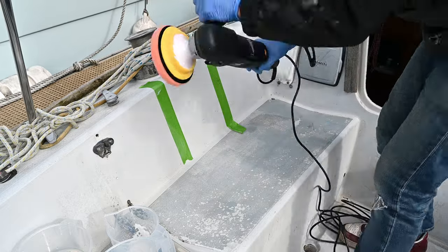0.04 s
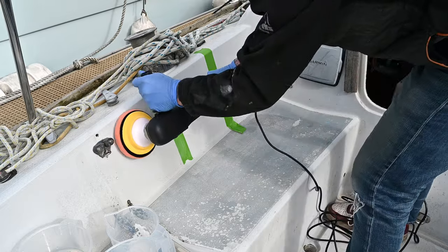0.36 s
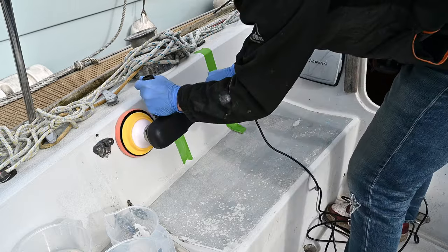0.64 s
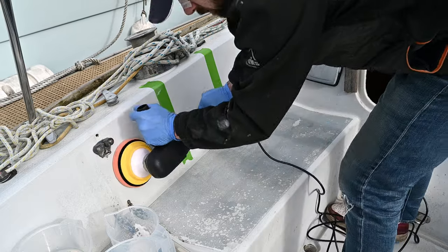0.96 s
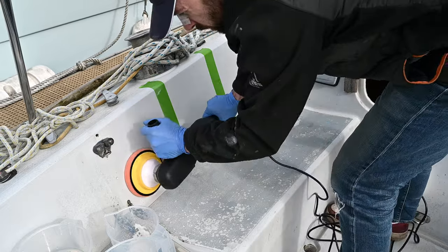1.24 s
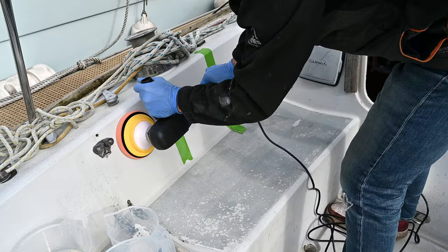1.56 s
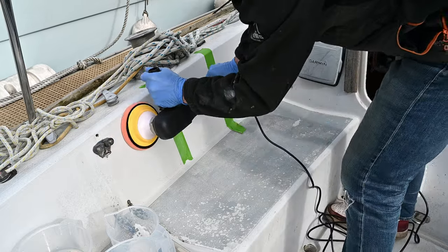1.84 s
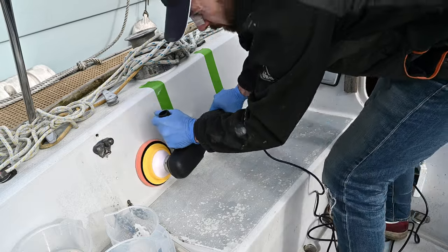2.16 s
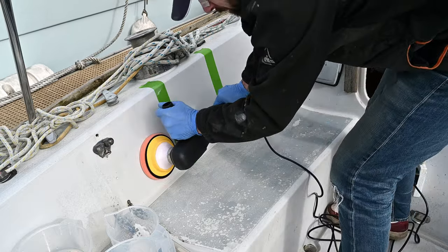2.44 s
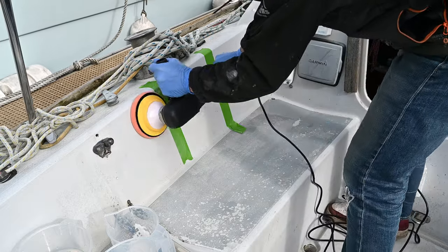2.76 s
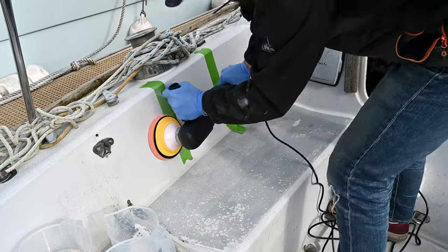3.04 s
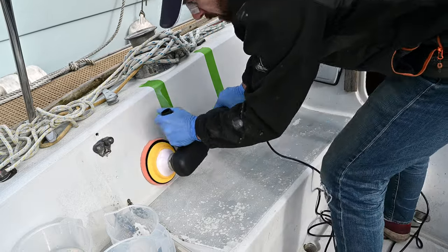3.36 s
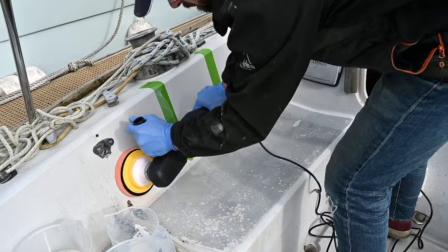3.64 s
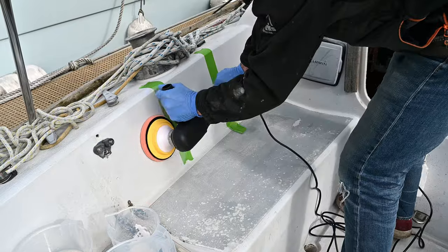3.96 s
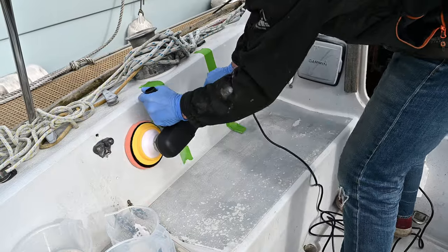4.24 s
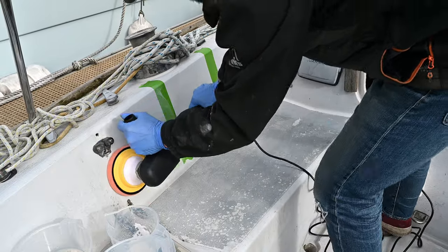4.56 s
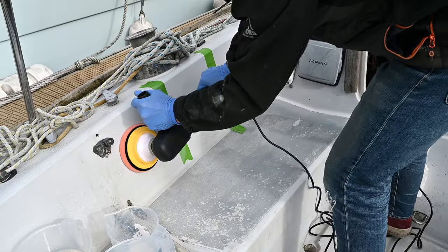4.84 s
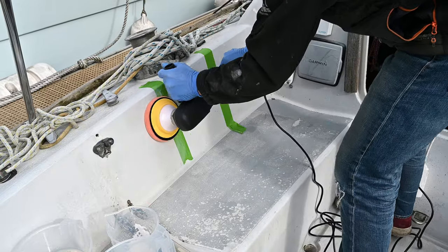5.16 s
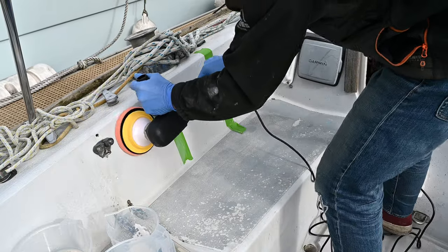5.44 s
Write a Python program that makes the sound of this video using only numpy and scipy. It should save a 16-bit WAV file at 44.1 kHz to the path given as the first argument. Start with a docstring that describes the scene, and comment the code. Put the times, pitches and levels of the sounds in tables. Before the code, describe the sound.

After a few soft bumps and a trigger snap, a power polisher buffs fibreglass with a raspy, high whine and short squeals.

```python
"""An electric polisher buffs the fibreglass cockpit of a boat, heard from close by.
Its foam pad is set against the wall, the trigger snaps, and the motor eases up to a held speed.
Gear teeth whine, the motor's brushes hiss, and cooling air rasps through the housing.
The pad rubs, groans and squeals on the panel, slowing the motor a little each time it grabs.
Behind it is quiet open air, and a faint haze of high treble widens the sound to left and right."""
import sys
import numpy as np
from scipy import signal
from scipy.fft import rfft, irfft, next_fast_len
from scipy.io import wavfile
from scipy.ndimage import uniform_filter1d

SR = 44100
rng = np.random.default_rng(int(sys.argv[2]) if len(sys.argv) > 2 else 0)


def wav_record(signal):
    """Record a signal, one row per channel, as 16-bit PCM in the file named by sys.argv[1]."""
    frames = np.transpose(np.atleast_2d(signal))
    bounded = np.clip(frames, -1, 1)
    # unit amplitude maps onto the largest positive 16-bit level
    quanta = np.round(bounded * 32767).astype(np.int16)
    wavfile.write(sys.argv[1], SR, quanta)


N = 246959
TIME = np.arange(N) / SR


def amp(db):
    """Turn decibels into a gain."""
    return 10 ** (np.asarray(db) / 20)


def unit(x):
    """Scale x to an average (rms) level of 1."""
    return x / np.sqrt(np.mean(x ** 2) + 1e-20)


def noise():
    """Fresh white noise."""
    return rng.standard_normal(N)


def curves(rows):
    """Join timed rows with straight lines: one curve for each column after the time."""
    times, *columns = np.transpose(rows)
    return [np.interp(TIME, times, column) for column in columns]


def wobble(rate):
    """A smooth random curve of level 1 that passes through about `rate` new values a second."""
    values = rng.standard_normal(int(N * rate / SR) + 4)
    return unit(signal.resample(values, next_fast_len(N))[:N])


def swell(middle, length):
    """A smooth bump in time, `length` seconds wide at half height."""
    offset = np.linspace(-1, 1, 41)
    return np.interp(TIME, middle + length * offset, np.cos(np.pi * offset / 2) ** 2)


def burst(start, rise, fade):
    """The outline of a tap: it rises quickly, then falls 60 dB in `fade` seconds."""
    age = np.maximum(TIME - start, 0)
    return (1 - np.exp(-age / rise)) * amp(-60 * age / fade)


def filtered(x, response):
    """Turn each frequency of x up or down by the gain that `response` gives it."""
    size = next_fast_len(N + SR // 4)
    return irfft(rfft(x, size) * response(np.fft.rfftfreq(size, 1 / SR)), size)[..., :N]


def shaped(x, points):
    """Filter x along a curve of (Hz, dB) points."""
    hz, db = np.transpose(points)
    return filtered(x, lambda f: amp(np.interp(np.log(f + 1), np.log(hz), db)))


def coloured(x, points):
    """Give x a tone colour and bring it to level 1."""
    return unit(shaped(x, points))


def resonant(x, modes, surge_db):
    """Let x ring at (Hz, width in Hz, dB) resonances that each swell and fade, at level 1."""
    total = 0
    for k, (hz, width, db) in enumerate(modes):
        ring = filtered(x, lambda f: 1j * f * width / (hz * hz - f * f + 1j * f * width))
        total += (-1) ** k * amp(db + surge_db * wobble(20)) * ring
    return unit(total)


# The tone colour of the open air. Each row: frequency in Hz, level in dB.
OPEN_AIR_COLOUR = [(15, -37), (25, -41), (125, -12.5), (278, 1.5), (2500, -16.5), (2780, -33), (15000, -72)]
# The low rumble. Each row: time in seconds, level in dB.
RUMBLE_LEVELS = [(0, -53.5), (.75, -59), (1, -78), (3.55, -65), (3.66, -54.5), (3.95, -55), (4.3, -72),
                 (4.7, -61), (5.2, -62), (5.6, -78)]

def outdoors():
    """Quiet open air with a low rumble that comes and goes."""
    rumble = coloured(noise(), [(15, -11), (45, -6), (90, 0.5), (250, -13), (2000, -80)])
    return amp(curves(RUMBLE_LEVELS)[0]) * rumble + amp(-51.5) * coloured(noise(), OPEN_AIR_COLOUR)


# The tone colour of the treble haze. Each row: frequency in Hz, level in dB next to the main sound.
SPREAD_COLOUR = [(1500, -91), (2900, -46), (5000, -41), (7000, -24.5), (10000, -14), (12000, -13.5),
                 (15000, -10)]

def treble_spread(x, fade_s):
    """A faint, short haze of high treble that widens the sound to left and right."""
    age = np.arange(SR // 10) / SR
    tail = rng.standard_normal(len(age)) * amp(-60 * age / fade_s)
    haze = signal.fftconvolve(x, tail / np.linalg.norm(tail))[:N]
    return shaped(haze, SPREAD_COLOUR)


# Soft bumps. Each row: start in seconds, level in dB, strongest frequency in Hz, fade in seconds.
WALL_TOUCHES = [(.123, -40.5, 2520, 0.091), (0.1837, -27.5, 6000, 0.012), (0.2005, -26, 1940, 0.019),
                (0.216, -24.5, 1950, 0.034), (0.212, -32.5, 342, 0.1), (.313, -39, 3950, 0.046),
                (0.381, -41, 4300, 0.021), (0.4, -36.5, 2800, 0.047), (0.469, -38.5, 4300, 0.026)]
# The foam brushing the wall. Each row: time in seconds, level in dB.
FOAM_LEVELS = [(0, -49.5), (.11, -47.5), (.14, -42.5), (.22, -42.5), (.25, -50), (.6, -50)]

def setting_down():
    """Pad and hands bump the wall, and the foam brushes against it."""
    bumps = 0
    for start, db, hz, fade in WALL_TOUCHES:
        colour = [(hz / 2, -8), (hz, 0), (hz * 1.48, -12), (hz * 2, -24), (hz * 10, -58)]
        bumps += amp(db) * burst(start, 0.0011, fade) * coloured(noise(), colour)
    foam = coloured(noise(), [(100, 3.5), (1000, 14.5), (3500, 4.5), (6000, -9), (15000, -22.5)])
    return bumps + amp(curves(FOAM_LEVELS)[0]) * foam


# The trigger's snap and its rebound. Each row: start in seconds, level in dB.
TRIGGER_SNAPS = [(0.555, -14.5), (0.561, -31)]
# The tone colour of a snap. Each row: frequency in Hz, level in dB.
SNAP_COLOUR = [(120, -44), (200, -15), (677, -20), (992, -14), (1590, -4), (2380, -9), (2800, 1),
               (3480, -17), (6130, -13), (6830, -20), (12000, -36), (15500, -41)]

def trigger():
    """The hard plastic trigger snaps, leaving a faint, longer ring in the casing."""
    snaps = sum(amp(db) * (burst(start, 0.0013, 0.016) + amp(-20) * burst(start, 0.0022, 0.16))
                for start, db in TRIGGER_SNAPS)
    return snaps * coloured(noise(), SNAP_COLOUR)


# Moments when the pad grabs the panel's glossy coat.
# Each row: middle in seconds, length in seconds, squeal level in dB, drop in tooth rate in Hz.
PAD_GRABS = [(1.076, 0.059, -29, 14.3), (1.192, 0.093, -35, 21.6), (1.319, 0.049, -35, 16.2),
             (1.444, .09, -27, 22.8), (1.751, 0.059, -32, 13.6), (1.882, .08, -27, 24.3),
             (1.99, 0.061, -27.5, 28), (2.186, .1, -37, 19), (2.37, .14, -44, 19.7),
             (2.63, 0.11, -31, 25.6), (2.858, 0.078, -28, 25), (2.969, 0.054, -25, 25),
             (3.093, .11, -25.5, 26), (3.259, 0.095, -30, 18.2), (3.498, 0.047, -42, 17),
             (3.632, .11, -31.5, 19), (3.82, 0.16, -26.5, 26), (4.002, .07, -29.5, 14.4),
             (4.17, 0.059, -28.5, 24.3), (4.389, .11, -29.5, 20.8), (4.69, 0.065, -26.5, 20.5),
             (4.831, .1, -28, 18), (4.982, .15, -40, 13.2)]

def grabs():
    """Each grab squeals and drags the motor down: gives the squeal's gain and the drop in Hz."""
    squeal_gain = sum(amp(db) * swell(middle, length) for middle, length, db, _ in PAD_GRABS)
    sag_hz = sum(hz * swell(middle, length) for middle, length, _, hz in PAD_GRABS)
    return squeal_gain, sag_hz


# "Speed" is the tooth rate: how many gear teeth meet each second.
SWITCH_ON_S, SPIN_UP_S, FULL_SPEED_HZ = TRIGGER_SNAPS[0][0], 0.29, 1019
TEETH_PER_PAD_TURN = 87

def shaft(sag_hz):
    """One shaft drives the gears and the slow, off-centre pad; it starts softly, then holds its speed."""
    ramp = np.clip((TIME - SWITCH_ON_S) / SPIN_UP_S, 0, 1) ** 2
    speed = ramp * (FULL_SPEED_HZ - sag_hz)
    pad_turn = np.sin(2 * np.pi * np.cumsum(speed) / SR / TEETH_PER_PAD_TURN + .5 * wobble(4))
    hunting = .003 * wobble(14)  # the speed control drifts around its target
    pad_drag = .003 * pad_turn  # the pad slows the shaft slightly once a turn
    uneven_speed = speed * (1 + hunting + pad_drag + .002 * wobble(45))
    tooth_phase = 2 * np.pi * np.cumsum(uneven_speed) / SR
    return speed, tooth_phase, pad_turn


def drive(speed, full_hz=590):
    """Rasping and rubbing grow with speed, from a gain of -20 dB up to 0 dB."""
    return np.maximum(np.minimum(speed / full_hz, 1) ** 1.6, amp(-20))


# How hard the pad leans on the panel. Each row: time in seconds, pressure in dB.
PAD_PRESSURE = [(0.85, -42.5), (1.3, -36), (1.54, -45), (2.04, -38.5), (2.24, -36), (2.25, -42.5),
                (2.34, -33), (2.79, -40.5), (3.28, -32.5), (3.52, -39), (4.18, -35), (4.22, -43),
                (4.37, -36.5), (4.49, -39.5), (5.28, -42), (5.6, -48)]
# The tone colour of the rubbing. Each row: frequency in Hz, level in dB.
RUB_COLOUR = [(25, -37), (100, -39), (210, -8), (480, 0), (620, 1), (820, 1), (1000, -11), (1800, 1.5),
              (5000, -19.5)]
# Where the panel groans and the pad squeals. Each row: pitch in Hz, width in Hz, level in dB.
PANEL_RINGS = [(616.8, 69, 0), (732, 110, -2), (1560, 150, -6)]
SQUEAL_RINGS = [(1137, 140, 0.047), (1234, 89, 0.45)]

def pad(speed, pad_turn, grab_gain):
    """The foam sticks and slips; pressing harder makes the panel groan, and each grab squeals."""
    press_db = curves(PAD_PRESSURE)[0] + 38  # 0 for an ordinary stroke
    slips = amp(2.0 * wobble(190) + 0.85 * pad_turn)
    rub = amp(-38.5 + 0.5 * press_db) * coloured(noise() * slips, RUB_COLOUR)
    # the slips partly lock to the panel's lowest ring: a wandering tone and its octave
    slip_phase = 2 * np.pi * PANEL_RINGS[0][0] * TIME + 0.99 * wobble(70)
    groan = amp(-3.5) * resonant(noise() * slips, PANEL_RINGS, surge_db=2.5)
    groan += amp(-6.5) * np.sin(slip_phase)
    squeal = amp(-6.5) * resonant(noise() * slips, SQUEAL_RINGS, surge_db=1.8)
    squeal += amp(-4.5) * np.sin(2 * slip_phase)
    squeal_gain = np.hypot(amp(-36), grab_gain)  # a little squeal stays between grabs
    return drive(speed) * (rub + amp(-38.5 + 1.76 * press_db) * groan + squeal_gain * squeal)


# The tone colour of the cooling air. Each row: frequency in Hz, level in dB.
AIR_COLOUR = [(60, -28.5), (500, -15), (900, -2.5), (1400, -5.5), (1900, -4), (2130, -7), (2350, -4),
              (2800, -3), (3050, 2.5), (3380, -5), (3600, -3.5), (4100, -5.5), (4500, -10), (5100, -9),
              (6600, -16.5), (10000, -18), (10700, -25.5), (15000, -31)]
# Where the housing rings. Each row: pitch in Hz, width in Hz, level in dB.
HOUSING_RINGS = [(2756, 280, 2), (3250, 93, -1)]
# Spells of harder rattling. Each row: middle in seconds, length in seconds, rise in dB.
RATTLE_SPELLS = [(1.022, 0.058, 6), (2.08, .1, 5.5), (2.424, 0.079, 5), (2.93, .12, 4), (3.38, 0.084, 6.5),
                 (3.87, .12, 4.5), (4.549, 0.26, 3.5)]

def housing_rasp(speed, grit):
    """Cooling air rushes through the housing, which rings and now and then rattles harder."""
    air = amp(-1) * coloured(noise() * grit, AIR_COLOUR)
    shaken_db = sum(db * swell(middle, length) for middle, length, db in RATTLE_SPELLS)
    rattle = amp(-6 + shaken_db) * resonant(noise() * grit, HOUSING_RINGS, surge_db=2)
    return amp(-27.5) * drive(speed) * (air + rattle)


# How the buzz comes and goes. Each row: time in seconds, level in dB before its swings are widened.
BUZZ_LEVELS = [(0.75, -32.5), (0.78, -33), (0.91, -37.5), (1.8, -31.5), (1.92, -35.5), (3.07, -36),
               (3.11, -32), (3.6, -36), (5.23, -39.5), (5.57, -31.5), (5.6, -41)]

def body_buzz(speed, grit, pitch_hz=1607, width_hz=105):
    """A lower resonance of the tool buzzes on and off."""
    swing_db = 1.42 * (curves(BUZZ_LEVELS)[0] + 38)
    ring = resonant(noise() * grit, [(pitch_hz, width_hz, 0)], surge_db=3)
    return amp(-41 + swing_db) * drive(speed) * ring


# The tone colour of the brushes. Each row: frequency in Hz, level in dB.
BRUSH_COLOUR = [(5000, -14), (9800, -2), (10700, -6.5), (12250, 3.5), (12750, 0), (13200, 3), (13800, -5),
                (14300, -5), (17000, -18)]
# How the treble rises and falls. Each row: time in seconds, gear whistle in dB, brush hiss in dB.
TREBLE_LEVELS = [(0.85, -52, -43), (0.92, -39.5, -40.5), (1.84, -45.5, -43), (2.46, -38.5, -45),
                 (2.77, -45.5, -43), (3.15, -47, -47.5), (3.61, -40.5, -42), (3.82, -39, -42.5),
                 (4.3, -43.5, -46), (4.57, -43.5, -40.5), (4.87, -45, -44.5), (5.07, -40, -45),
                 (5.17, -39, -46), (5.23, -41.5, -40), (5.58, -49, -41), (5.6, -40, -46)]

def brush_hiss(speed, grit):
    """The brushes slide on the motor's spinning contacts and hiss louder the faster they run."""
    _, hiss_db = curves(TREBLE_LEVELS)
    speed_gain = np.maximum((speed / FULL_SPEED_HZ) ** 3, amp(-30))
    flicker_db = 2.5 * wobble(45)
    return amp(hiss_db + 1 + flicker_db) * speed_gain * coloured(noise() * grit, BRUSH_COLOUR)


# The rough tones of the motor's spinning core. Each row: multiple of the tooth rate, level in dB.
ROTOR_TONES = [(.207, -14), (2.215, -2), (2.71, 0), (3.213, 4), (4.803, 3.5), (5.222, -2.5), (6.225, -3),
               (9.6, -12)]

def rotor(speed, tooth_phase):
    """The spinning contacts and fan add unsteady tones that rise and fall with the brush hiss."""
    tones = 0
    for multiple, db in ROTOR_TONES:
        flutter_db = 3.5 * wobble(25.23)
        tones += amp(db + flutter_db) * np.sin(multiple * tooth_phase + 1.53 * wobble(70))
    _, hiss_db = curves(TREBLE_LEVELS)
    swing_db = 0.78 * (hiss_db + 43)
    return amp(-42 + swing_db) * drive(speed) * tones


def gear_knocks(speed, below_hz=780):
    """While the motor gathers speed, the gear teeth knock across the slack between them."""
    speed_gain_per_s = np.gradient(speed) * SR
    pull = np.clip(speed_gain_per_s / 4000, 0, 1) * (speed < below_hz)
    chatter = noise() * amp(2.7 * wobble(360))
    knocks = resonant(chatter, [(193, 92, -14), (1630, 110, -9), (2000, 270, -7)], surge_db=1.5)
    return amp(-31) * drive(speed) * uniform_filter1d(pull, size=2000) * knocks


def gear_tone(phase, flutter_db):
    """One pure tone of the gears, with a fluttering level."""
    flutter = unit(amp(flutter_db * wobble(55)))
    return np.sqrt(2) * flutter * np.sin(phase + rng.uniform(0, 2 * np.pi))


# The low whine as the tool is moved about.
# Each row: time in seconds, level of the tone at the tooth rate in dB, level of its octave in dB.
WHINE_LEVELS = [(0.85, -35, -38), (1.15, -38.5, -36), (1.18, -42, -41), (1.34, -41.5, -34),
                (1.42, -38.5, -45), (1.58, -35.5, -34), (2.2, -45, -42.5), (2.9, -40.5, -35),
                (3.08, -61, -48), (3.16, -45, -42), (4.04, -42, -48.5), (4.12, -53, -44), (4.16, -44, -38),
                (4.39, -36, -44.5), (5.0, -37, -38), (5.08, -40, -44), (5.24, -41, -35), (5.6, -32, -36.5)]
# The piercing tone at three times the tooth rate. Each row: time in seconds, level in dB.
PIERCING_LEVELS = [(0.85, -57), (0.89, -33), (1.55, -31.5), (1.63, -39.5), (1.92, -28), (2.09, -35.5),
                   (2.12, -24.5), (2.32, -33), (3.23, -30), (3.38, -38.5), (3.52, -26.5), (3.75, -37),
                   (4.12, -30), (4.21, -26.5), (4.42, -33.5), (5.07, -27.5), (5.37, -38.5), (5.6, -32)]
# A boost in dB for each of those three tones, lowest first.
WHINE_BOOSTS = [1.5, 2, 1.5]
# The high whistle of the gears. Each row: multiple of the tooth rate, level in dB.
WHISTLE_TONES = [(4, -0.5), (5, -1), (6, -7.5), (7, -4.5), (8, -7.5), (9, -17), (10, -13.5), (12, -9.5),
                 (13, -20), (14, -19), (15, -20)]

def gear_whine(speed, tooth_phase, sag_hz):
    """Meeting teeth sing at multiples of the tooth rate, louder as the motor speeds up."""
    phase = tooth_phase + .03 * wobble(160)  # slack between the teeth jitters their timing
    whine_db = curves(WHINE_LEVELS) + curves(PIERCING_LEVELS)  # a list of three curves
    whine = sum(amp(db + WHINE_BOOSTS[k]) * gear_tone((k + 1) * phase, flutter_db=1.84)
                for k, db in enumerate(whine_db))
    whistle = sum(amp(db) * gear_tone(multiple * phase, flutter_db=3.5)
                  for multiple, db in WHISTLE_TONES)
    whistle_db = curves(TREBLE_LEVELS)[0] + 2 - .2 * sag_hz  # dips at each grab of the pad
    running = speed / FULL_SPEED_HZ
    return running ** 9.1 * whine + running ** 1.2 * amp(whistle_db) * whistle


def scene():
    """The polisher sounds in the middle, with its high treble spread to left and right."""
    grab_gain, sag_hz = grabs()
    speed, tooth_phase, pad_turn = shaft(sag_hz)
    # air, buzz and hiss share one rough texture that pulses with the teeth
    grit = amp(1.5 * wobble(700)) * (1 + 0.18 * np.cos(tooth_phase))
    motor_noise = housing_rasp(speed, grit) + body_buzz(speed, grit) + brush_hiss(speed, grit)
    polisher = amp(0.15 * pad_turn) * motor_noise + rotor(speed, tooth_phase)
    polisher += pad(speed, pad_turn, grab_gain)
    polisher += gear_knocks(speed) + gear_whine(speed, tooth_phase, sag_hz)
    powered = np.clip((TIME - SWITCH_ON_S) / 0.019, 0, 1)
    centre = outdoors() + setting_down() + trigger() + powered * polisher
    spread = treble_spread(centre, fade_s=.08)
    return np.array([centre + spread, centre - spread])


def record(dry):
    """The very highest treble is softened, and everything above it is cut off."""
    top_hz = 15740
    return filtered(dry, lambda f: amp(np.interp(f, [15000, top_hz], [0, -4])) * (f < top_hz))


dry = scene()
out = record(dry)
wav_record(out)
```